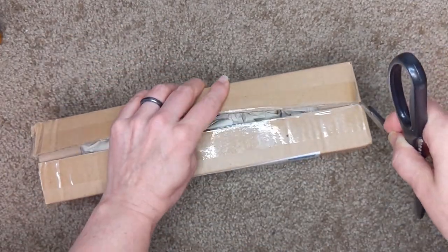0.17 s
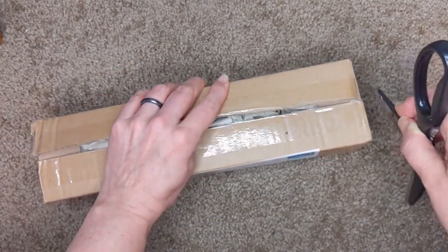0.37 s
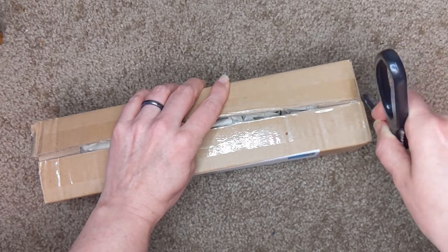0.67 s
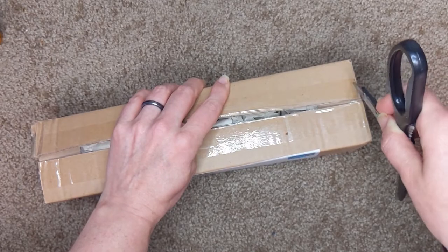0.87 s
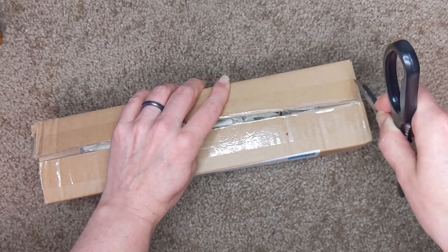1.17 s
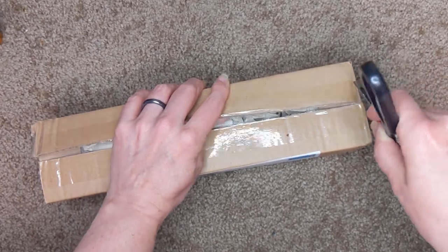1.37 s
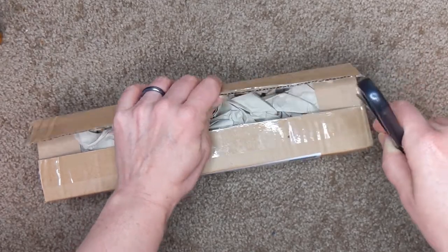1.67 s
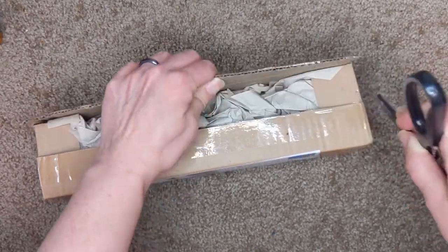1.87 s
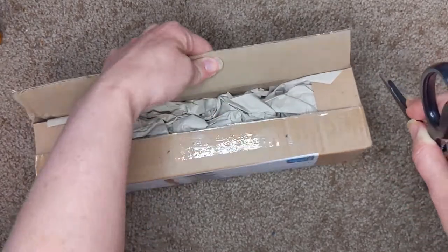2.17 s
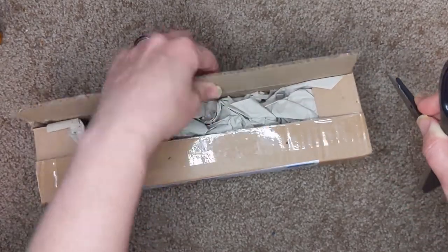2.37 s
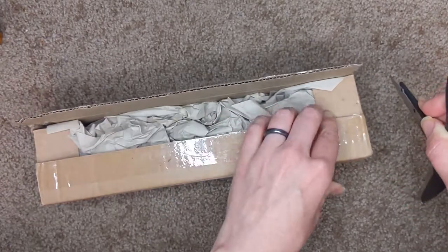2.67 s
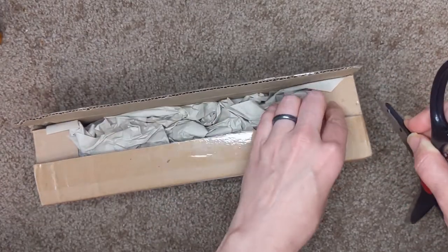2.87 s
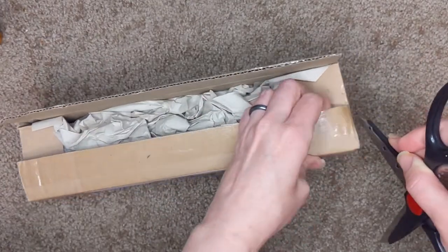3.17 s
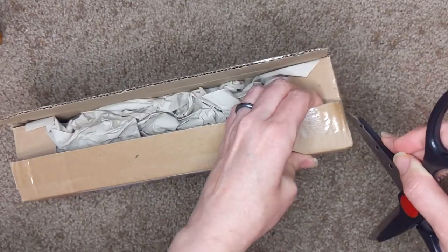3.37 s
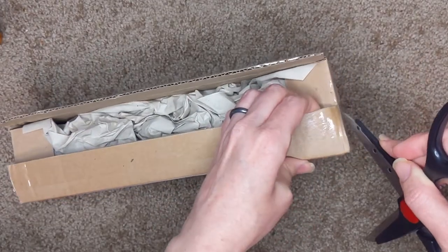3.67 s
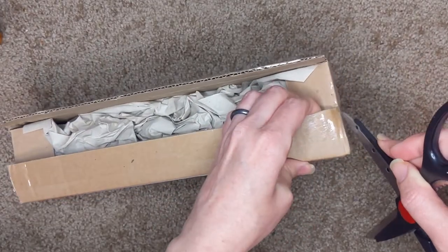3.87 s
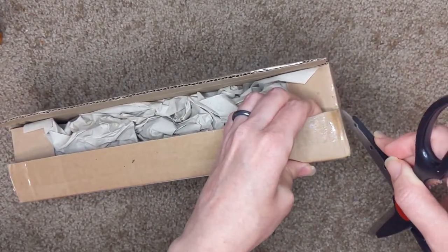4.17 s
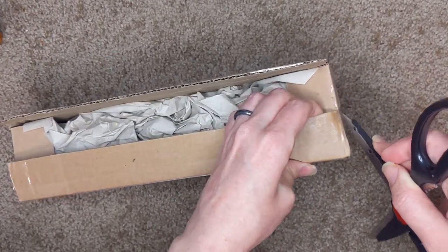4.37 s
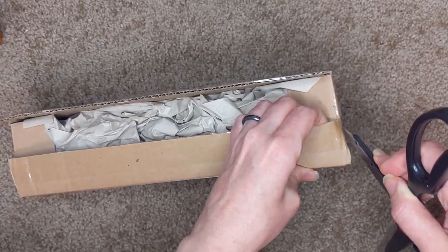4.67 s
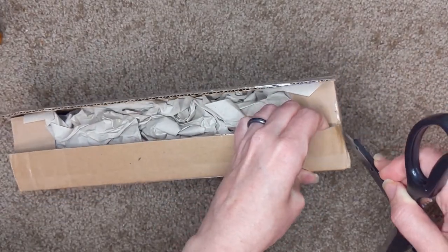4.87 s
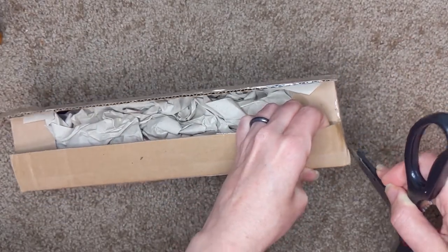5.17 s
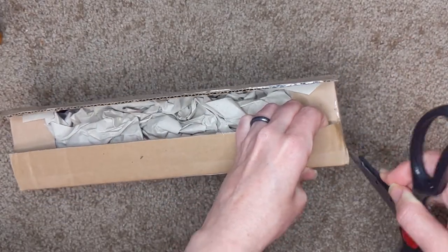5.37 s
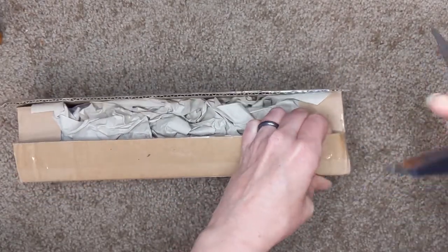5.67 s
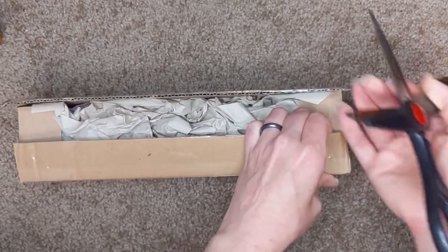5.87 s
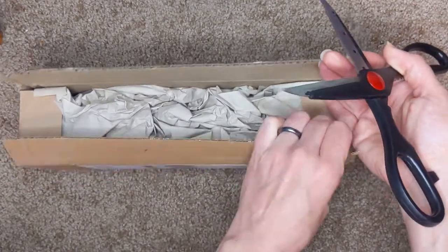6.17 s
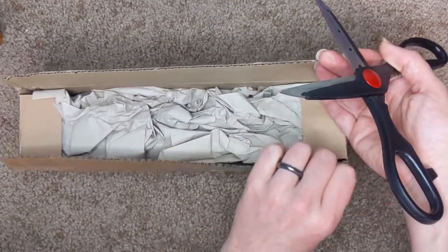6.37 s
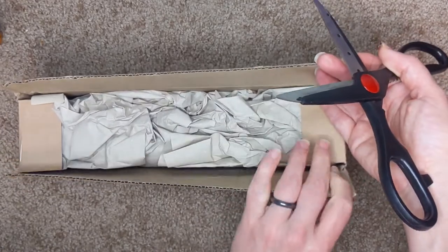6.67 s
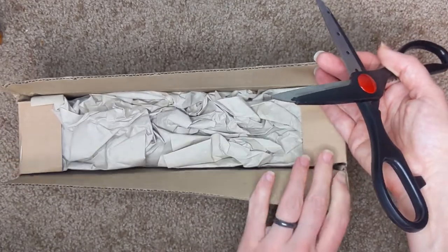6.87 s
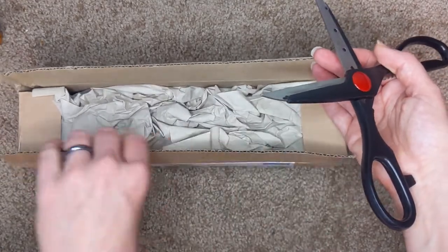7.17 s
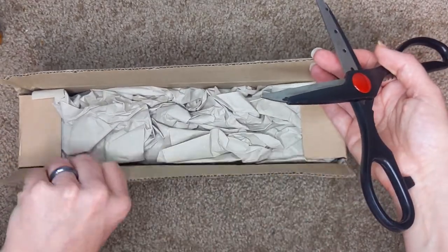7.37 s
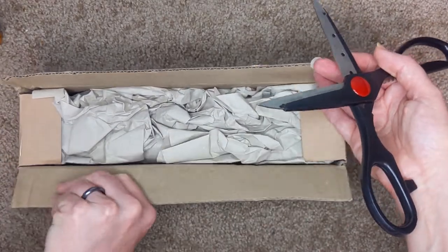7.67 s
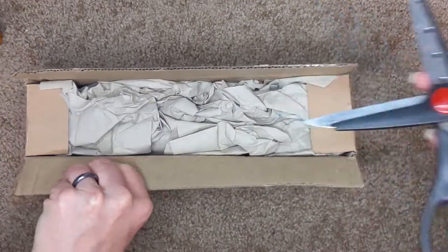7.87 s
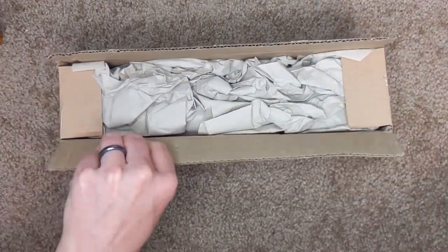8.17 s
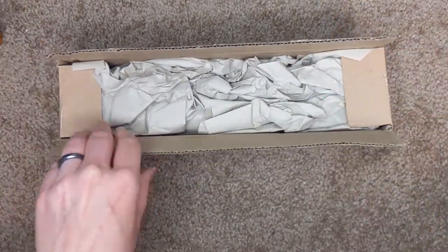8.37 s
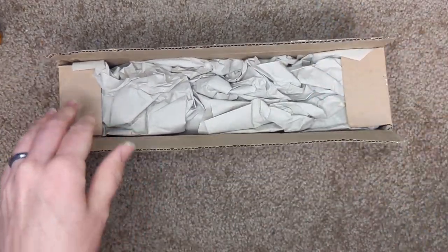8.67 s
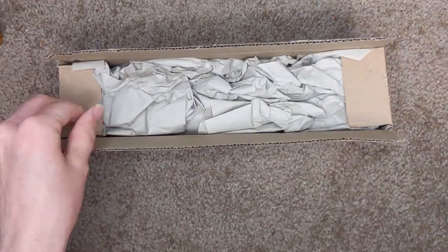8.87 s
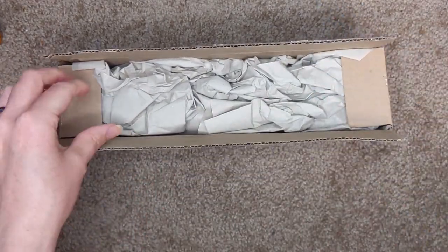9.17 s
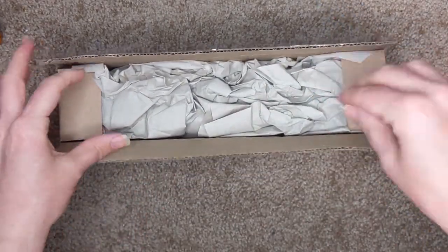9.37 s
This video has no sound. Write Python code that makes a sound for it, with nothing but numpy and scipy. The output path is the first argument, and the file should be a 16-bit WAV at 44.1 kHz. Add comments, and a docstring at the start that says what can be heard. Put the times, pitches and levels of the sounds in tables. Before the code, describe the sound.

A taped cardboard box pops open with a loud crack, flaps and hands scrape and rustle, then scissors drop with a bright clatter.

```python
"""A small carpeted room, where a long cardboard box is opened: scissors pick at the tape until it snaps,
flaps are pulled up and scrape, hands slide over card and paper, and the scissors clatter down on something hard.
Sliding and crushing are trains of tiny stick-slip bursts through resonant colours; knocks and ticks are short
noise bursts and panel modes; the scissors are damped modes and noise; a binding blade groans as an unsteady tone.
A low hum of two beating tones and quiet air lie underneath."""
import sys
import numpy as np
from scipy import signal
from scipy.fft import rfft, irfft, next_fast_len
from scipy.io import wavfile
from scipy.ndimage import uniform_filter1d

SR = 44100
rng = np.random.default_rng(int(sys.argv[2]) if len(sys.argv) > 2 else 0)


def materialize(psi):
    """Save the field psi as 16-bit PCM at rate SR to the path in sys.argv[1].

    A 1-D psi becomes a single channel; in a 2-D psi each row is a channel.
    """
    bounded = np.clip(np.atleast_2d(psi).T, -1, 1)
    quanta = np.round(bounded * 32767).astype(np.int16)
    wavfile.write(sys.argv[1], SR, quanta)


N = 418950
TIME = np.arange(N) / SR
AGE = TIME[:SR // 3]  # seconds since a contact

# Spectrum of the hiss of skin and paper. Each row: frequency in Hz, filter gain in dB.
HISS_COLOUR = [(400, -35.5), (1500, -10), (5000, -7), (7200, -9.5), (9500, 0), (12000, -1), (16000, -6.5)]
# Spectrum of a hollow box. Each row: frequency in Hz, filter gain in dB.
HOLLOW_COLOUR = [(60, -27.5), (200, -7), (400, -2.5), (520, -5), (750, -21.5), (2000, -38)]


def undb(db):
    """Logarithmic level: decibels become an amplitude gain."""
    return 10 ** (np.asarray(db) / 20)


def colour(x, points):
    """Minimum-phase filtering: the folded cepstrum of a gain curve (Hz, dB) yields a causal response."""
    n = next_fast_len(x.shape[-1] + SR // 10, True) // 2 * 2
    n = 2 * next_fast_len(n // 2, True)
    hz, db = np.transpose(points)
    bins = np.maximum(np.arange(n // 2 + 1) * SR / n, 1)
    gain_db = np.interp(np.log(bins), np.log(hz), db)
    cepstrum = irfft(np.log(undb(gain_db)), n)
    # fold the anticausal half onto the causal half
    cepstrum[1:n // 2] *= 2
    cepstrum[n // 2 + 1:] = 0
    response = np.exp(rfft(cepstrum))
    return irfft(rfft(x, n) * response, n)[..., :x.shape[-1]]


def unit(x):
    """Normalisation of power: scale to rms 1."""
    return x / np.sqrt(np.mean(x ** 2))


def blow(x, window=0.012):
    """Normalisation of energy: scale a hit to the energy of a short window (s) at rms 1."""
    return unit(x) * np.sqrt(window * SR / x.shape[-1])


def fade(t60):
    """Exponential damping: the amplitude falls by 60 dB in t60 seconds."""
    return np.exp(-np.log(1000) * AGE / max(t60, 1e-3))


def ports(mid, side, split_hz):
    """Spatial coherence: two microphones hear long waves alike and short waves differently."""
    low, high = (signal.butter(2, min(split_hz, SR / 4), kind, fs=SR) for kind in ("low", "high"))
    shared = signal.lfilter(*low, mid)
    return np.array([shared + signal.lfilter(*high, s) for s in side])


def noise(n, split_hz):
    """Partly coherent stereo noise: common below the split, independent above it."""
    return ports(rng.standard_normal(n), rng.standard_normal((2, n)), split_hz)


def add(out, s, x):
    """Superposition: mix a sound in at time s."""
    i = max(int(s * SR), 0)
    out[:, i:i + x.shape[-1]] += x[..., :N - i]


def walk(rate):
    """Smoothed random fluctuation about zero, with rate new values a second and a spread near 0.6."""
    k = max(int(SR / rate), 2)
    held = np.repeat(rng.standard_normal(N // k + 1), k)
    return 0.7 * uniform_filter1d(held, k)[:N]


def resonate(x, peaks):
    """Parallel resonance: each peak (Hz, width Hz, dB) passes its own band."""
    out = 0
    for hz, width, db in peaks:
        out = out + undb(db) * signal.lfilter(*signal.iirpeak(hz, hz / width, fs=SR), x)
    return out


def shifting(x, depth_db, rate):
    """Moving contact patch: each octave swells and sinks by itself."""
    out = 0
    for hz in 700 * 2. ** np.arange(4):
        low = signal.sosfiltfilt(signal.butter(3, hz, fs=SR, output="sos"), x)
        out = out + low * undb(depth_db * walk(rate))
        x = x - low
    return out + x


def snap(sharp_s, tail, tail_s):
    """Impulsive contact: a noise burst with a weaker tail (t60 in s) that takes 1.2 ms to build up."""
    rise = np.clip(AGE / .0012, 0, 1)
    return noise(len(AGE), 1100) * rise * (fade(sharp_s) + tail * fade(tail_s))


def background(hum_db=-5.0):
    """Interference of two close tones makes a slowly beating hum over broadband room air."""
    # Tones of the hum. Each row: frequency in Hz, level in dB before hum_db, time of opposition in seconds.
    hum_tones = [(59.4, -62.5, .3), (58.79, -68, .3)]
    # Spectrum of the room air. Each row: frequency in Hz, filter gain in dB.
    air_colour = [(15, -31), (25, -5), (64, -8), (195, -18.5), (326, -18), (1070, -25), (7110, -33),
                  (13200, -31), (16000, -40.5)]
    hum = 0
    for k, (hz, db, s) in enumerate(hum_tones):
        tone = np.sqrt(2) * np.cos(2 * np.pi * hz * (TIME - s))
        hum = hum + (-1) ** k * undb(db) * tone
    air = noise(N, 630) + 1.7 * rng.standard_normal((2, N))
    return undb(-67.0) * unit(colour(air, air_colour)) + undb(hum_db) * hum


def friction(rate, spread_db, grain_s, smooth, split_hz):
    """Stick-slip: fibres catch and let go in tiny bursts of uneven size over a smooth sliding noise."""
    slips = rng.random(N) < rate / SR
    sizes = undb(spread_db * np.minimum(rng.exponential(size=N), 3)) * slips
    bursts = signal.lfilter([1], [1, -np.exp(-1 / (grain_s * SR))], sizes)
    return (unit(bursts) + smooth) * noise(N, split_hz)


def stroke(s, length):
    """Kinematics of one sliding movement: its speed rises, holds and falls to rest."""
    attack, release = 0.15, 0.5  # shares of the length
    corners = s + length * np.array([0, attack, 1 - release, 1])
    return np.interp(TIME, corners, [0, 1, 1, 0])


def crinkles(per_s, low_hz=800, high_hz=11000, swings=9):
    """Buckling: creases give way in little damped oscillations, each with its own size and pitch."""
    spread_db = 4
    out, age = np.zeros((2, N)), AGE[:SR // 30]
    for when, pitch, size, lag in rng.random((int(per_s * N / SR), 4)):
        hz = low_hz * (high_hz / low_hz) ** pitch
        phases = np.array([[0], [(lag - .5) * hz / low_hz]])
        decay = np.exp(-np.log(1000) * age * hz / swings)  # -60 dB after this many swings
        grain = np.sin(2 * np.pi * hz * age + phases) * decay
        add(out, when * N / SR, undb(-spread_db * np.log(max(size, .05))) * grain)
    return unit(out)


def rubbing():
    """Sliding friction: card gives the scrape, the box its hollow body, skin and paper the hiss."""
    # Strokes of blade, flap or hand: the blade picks at the tape, the far flap is lifted, fingers push in
    # by the paper, the blade works at the end, the near flap opens, the hand moves on to the end flap.
    # Each row: start in seconds, length in seconds, then scrape, hiss and hollow box levels in dB.
    strokes = [ (0.0, 0.46, -73.5, -73, -76.5), (1.002, 0.061, -57.5, -57, -61),
               (1.101, 0.047, -58, -60, -61.5), (1.218, 0.16, -61, -59.5, -66.5),
               (1.353, 0.36, -59, -62.5, -55.5), (1.556, 0.027, -44, -58, -39), (1.69, 0.47, -65, -70, -69),
               (1.836, 0.093, -77, -56.5, -83), (1.985, 0.26, -58.5, -56, -64),
               (2.147, 0.029, -49.5, -52.5, -52.5), (2.185, 0.34, -68, -64, -76),
               (2.753, 0.18, -60.5, -57, -65), (2.99, 0.43, -56.5, -61.5, -62), (4.25, 0.56, -66, -68, -75),
               (4.414, 0.14, -64, -64.5, -61.5), (4.496, 0.027, -53.5, -53.5, -58),
               (4.583, 0.5, -64, -61, -71.5), (5.1, 0.25, -60.5, -60.5, -67),
               (5.197, 0.022, -47.5, -44.5, -48.5), (5.246, 0.62, -62, -62, -67.5),
               (5.44, 0.032, -49, -53, -49.5), (5.688, 0.67, -66.5, -58.5, -74),
               (5.962, 0.52, -58.5, -64.5, -61), (6.37, 0.13, -59.5, -53.5, -68),
               (6.488, 0.1, -53.5, -49, -58.5), (6.623, 0.061, -49.5, -48.5, -57),
               (6.528, 0.62, -57.5, -58.5, -64.5), (6.805, 0.077, -58, -46.5, -56),
               (6.949, 0.28, -56.5, -43.5, -67), (7.179, 0.21, -59.5, -50, -66.5),
               (7.419, 0.47, -53, -53.5, -58.5), (7.743, 0.68, -59, -54, -67.5),
               (8.125, 0.11, -62, -48.5, -69), (8.484, 0.68, -60, -64.5, -67),
               (9.173, 0.48, -65, -65.5, -63), (9.292, 0.033, -50, -46.5, -44.5),
               (9.351, 0.03, -41.5, -38.5, -45.5), (9.421, 0.084, -52.5, -52, -71)]
    # Spectrum of scraped card. Each row: frequency in Hz, filter gain in dB.
    card_colour = [(200, -17.5), (500, -9), (800, -3), (1050, 1), (1350, -6.5), (2100, -7), (3400, -7),
                   (5200, -11.5), (7500, -18), (16000, -29.5)]
    rest_db = -80.5  # the resting hand never lies quite still
    crinkle_db = -5  # relative to the card's scrape
    crinkle_full_db = -52.5  # lighter scrapes than this crease the card less

    power = np.full((3, N), undb(rest_db) ** 2)
    for s, length, scrape_db, hiss_db, box_db in strokes:
        power += np.outer(undb([scrape_db, hiss_db, box_db]) ** 2, stroke(s, length) ** 2)
    scrape, hiss, hollow = np.sqrt(power)

    fibres = friction(rate=1000, spread_db=4.2, grain_s=.0008, smooth=.55, split_hz=1700)
    card = unit(shifting(colour(fibres, card_colour), depth_db=1.5, rate=54))
    creasing = np.minimum(scrape / undb(crinkle_full_db), 1)
    card = card + undb(crinkle_db) * crinkles(per_s=70) * creasing
    body = friction(rate=740, spread_db=0.5, grain_s=0.0024, smooth=0.99, split_hz=610)
    box = unit(colour(body, HOLLOW_COLOUR))
    skin = friction(rate=1900, spread_db=6.0, grain_s=0.00062, smooth=3.6, split_hz=690)
    skin = unit(colour(skin, HISS_COLOUR))
    grip_db = 2.0 * walk(50)
    return (card * scrape + box * hollow) * undb(grip_db) + skin * hiss * undb(.5 * grip_db)


def box_ring(panel_hz):
    """Modal excitation: the box walls ring briefly; a small, high-pitched panel hardly stirs deep modes."""
    # Modes of the empty box. Each row: frequency in Hz (varied by some 3 %), level in dB (varied by some
    # 2 dB and relative within the ring), t60 in seconds.
    box_modes = [(147, 26.5, 0.097), (267.3, 6, .12), (480, 7, 0.07), (980, 4, 0.043), (1660, -1.5, 0.023)]
    out = 0
    for hz, db, t60 in box_modes:
        size, bend = rng.standard_normal(2)
        drive = min(hz / panel_hz, 1) ** 3
        mode = np.sin(2 * np.pi * hz * (1 + 0.03 * bend) * AGE) * fade(t60)
        out = out + undb(db + 2.0 * size) * drive * mode
    return blow(out)


def crack():
    """Fracture noise: the woody snap of card."""
    # Spectrum of the crack. Each row: frequency in Hz, filter gain in dB.
    crack_colour = [(100, -12.5), (500, -7.5), (1400, 7.5), (2200, 0.5), (2900, 3), (4700, -2.5),
                    (7000, -9.5), (16000, -26.5)]
    return blow(colour(snap(sharp_s=.017, tail=.42, tail_s=.06), crack_colour))


def tick():
    """Sudden release of adhesion: the thin snap of tape."""
    # Spectrum of the tick. Each row: frequency in Hz, filter gain in dB.
    tick_colour = [(600, -31), (5000, -2.5), (7500, -10.5), (9700, 4), (12000, -1.5), (16000, -5)]
    return blow(colour(snap(sharp_s=.007, tail=.2, tail_s=.04), tick_colour))


def knocks(swings=8, swell_s=0.003):
    """Release of stored tension: as tape or flap lets go come a tick, a card crack and a few panel swings."""
    # Knocks of the box and snaps of tape. Each row: start in seconds, panel frequency in Hz, thump level,
    # crack level and tick level in dB.
    knock_list = [(0.002, 334, -45, -63, -57), (0.305, 330, -66, -61, -57.5), (0.341, 274, -56, -65, -70),
                  (0.598, 407, -45, -76, -76), (0.835, 256, -61, -60.5, -60), (0.971, 955, -69, -57, -58.5),
                  (1.126, 286, -52.5, -76, -81), (1.352, 232, -55.5, -55, -67),
                  (1.402, 215, -50.5, -59, -58.5), (1.448, 275, -37, -43.5, -50.5),
                  (1.578, 288, -20, -23, -25.5), (2.096, 1000, -52.5, -61, -62),
                  (3.043, 1070, -53, -47, -53), (3.116, 1040, -49, -48, -46.5),
                  (3.273, 870, -51, -51.5, -61), (3.312, 580, -56.5, -57.5, -55),
                  (4.213, 830, -67, -75, -77), (5.158, 985, -48, -44, -39.5), (5.582, 1100, -78, -53, -54),
                  (5.688, 393, -50.5, -51, -54), (6.007, 328, -48, -47.5, -67.5),
                  (6.025, 230, -46, -54, -61), (6.144, 1094, -26.5, -26, -25),
                  (6.19, 1000, -47, -50, -36.5), (6.492, 486, -51, -53.5, -57),
                  (6.742, 820, -51.5, -54.5, -59), (6.798, 553, -44.5, -49.5, -48),
                  (6.831, 423, -48, -45.5, -58), (7.326, 410, -49, -56, -60),
                  (7.471, 480, -53.5, -54.5, -63), (7.502, 262, -55, -52, -55), (8.112, 460, -43, -45, -59)]
    # Spectrum of a thump on the box walls. Each row: frequency in Hz, filter gain in dB.
    thump_colour = [(35, -46.5), (80, -9.5), (150, -1.5), (1400, 1), (3000, -12), (8000, -32)]
    box_ring_db = -4.5  # relative to the thump
    boom_colour = [(60, -23.0), (105, 0.5), (260, -1.5), (3000, -45.5)]  # Hz, dB

    out = np.zeros((2, N))
    for s, hz, thump_db, crack_db, tick_db in knock_list:
        panel = np.sin(2 * np.pi * hz * AGE) * fade(swings / hz) * (1 - np.exp(-AGE / swell_s))
        # the whole box booms low under a large panel's own note
        boom = colour(noise(len(AGE), 1800) * fade(0.036), boom_colour)
        boom_share = 0.77 * min(300 / hz, 1)
        walls_colour = [(hz / 2, -15), (hz, 0), (hz + 250, -2), (hz + 900, -10), (6000, -35)]
        walls = colour(noise(len(AGE), 2000) * fade(0.05), walls_colour)
        thump = blow(panel) + boom_share * blow(boom) + 0.45 * blow(walls)
        thump = blow(colour(thump, thump_colour)) + undb(box_ring_db) * box_ring(hz)
        add(out, s, undb(thump_db) * thump + undb(crack_db) * crack() + undb(tick_db) * tick())
    return out


def ticks():
    """Small impulsive releases: tape unsticks or a fold flips, too slight to move the box."""
    # Dry ticks of sticky tape and paper. Each row: start in seconds, level in dB.
    tick_list = [(0.101, -61), (0.518, -57.5), (1.09, -52.5), (1.574, -30), (2.216, -45), (2.311, -50.5),
                 (2.333, -51.5), (2.378, -56.5), (3.003, -50), (3.455, -54), (6.378, -58), (6.399, -50.5),
                 (6.811, -52), (6.818, -46.5), (6.88, -50), (7.36, -45.5), (7.404, -53), (7.821, -46.5),
                 (7.987, -49.5), (8.103, -45.5), (8.257, -58)]
    crack_db = -12.5  # the card's share, relative to the tick
    out = np.zeros((2, N))
    for s, db in tick_list:
        add(out, s, undb(db) * (tick() + undb(crack_db) * crack()))
    return out


def binds(wall_hz=400):
    """Stick-slip drive: the binding blade makes the end wall groan, an unsteady woody note and a rasp."""
    # Groans of the end wall. Each row: time of the slip in seconds, level in dB, rasp level in dB
    # relative to the note.
    slips = [(0.603, -55, 1), (1.826, -50.5, 5.5), (5.159, -35.5, -1), (5.211, -37, -2.5),
             (5.388, -47, -1.5)]
    # Resonances of the wall around its main note. Each row: frequency in Hz, width in Hz, level in dB
    # relative within the rasp.
    wall_peaks = [(227, 24, 1.5), (530, 95, 3.5), (940, 220, 0.5), (1580, 96, -1.5)]
    swell_s, decay_s = 0.0079, 0.0095  # time constants before and after the slip

    unsteady_hz = wall_hz * (1 + .07 * walk(160))
    note = np.sin(2 * np.pi * np.cumsum(unsteady_hz) / SR)
    rasp = unit(resonate(noise(N, 1200), wall_peaks))
    out = 0
    for s, db, rasp_db in slips:
        distance = np.maximum((s - TIME) / swell_s, (TIME - s) / decay_s).clip(0, 20)
        out = out + (note + undb(rasp_db) * rasp) * undb(db) * np.exp(-distance)
    return out


def crease(hz=980):
    """Plastic yielding: the fold gives way in little slips that ring the flap, weaker as the card yields."""
    # Flaps bending slowly along their creases. Each row: start in seconds, length in seconds,
    # level in dB at the start, from which it sags.
    bends = [(2.0, 0.46, -55), (4.26, 0.38, -68.5), (6.46, 0.56, -59), (7.47, 0.54, -58)]
    yield_db_per_s = 14
    slips = friction(rate=260, spread_db=3, grain_s=0.0012, smooth=.15, split_hz=1600)
    flap = colour(slips, [(hz / 2, -25), (hz - 160, -3), (hz, 0), (hz + 160, -3), (2 * hz, -28)])
    level = 0
    for s, length, db in bends:
        sagging_db = db - yield_db_per_s * np.maximum(TIME - s, 0)
        level = level + stroke(s, length) * undb(sagging_db)
    return unit(flap) * level


def crush(s, length):
    """Loading and unloading: pressure on the paper swells and eases as half a sine."""
    return np.sin(np.pi * np.clip((TIME - s) / length, 0, 1))


def paper(crackle_db=-2, hiss_db=-10):
    """Crackling noise: dense slips ring the paper's ever-changing pockets, and single folds snap on top."""
    # Fingers or blade crush the packing paper. Each row: start in seconds, length in seconds, level in dB.
    crushes = [(2.802, 0.059, -48), (2.901, 0.089, -54.5), (2.997, 0.035, -43.5), (3.022, 0.038, -43.5),
               (3.03, 0.17, -58.5), (3.081, 0.04, -49), (3.431, 0.044, -54.5), (5.479, .055, -57.5)]
    # Pockets and folds of crumpled paper. Each row: frequency in Hz, width in Hz, relative level in dB.
    pocket_peaks = [(1020, 410, 5), (3110, 770, -3.5), (4930, 900, -12)]
    slips = friction(rate=1400, spread_db=3.5, grain_s=.0006, smooth=.35, split_hz=1700)
    pockets = shifting(resonate(slips, pocket_peaks), depth_db=2.5, rate=45)
    folds = crinkles(per_s=130, low_hz=1240)
    hiss = unit(colour(slips, HISS_COLOUR))
    sound = unit(pockets) + undb(crackle_db) * folds + undb(hiss_db) * hiss
    return sound * sum(undb(db) * crush(s, length) for s, length, db in crushes)


def ring(lo_hz, hi_hz, freedom):
    """Modal synthesis: the modes within a range, weighted and detuned a little by every contact."""
    # Modes of scissors and the surface under them. Each row: frequency in Hz (before detuning), level in dB
    # relative within a range, t60 in seconds before the factor of freedom.
    modes = [(165.7, -16, .3), (261.7, 5, 0.088), (311, 0, 0.071), (470, 16, 0.13), (522, 2.5, 0.044),
             (689, -5, 0.069), (813, 7.5, 0.074), (1603, 4, 0.11), (2020, -4.5, 0.1), (2505, 7.5, 0.061),
             (3370, 4, 0.11), (4220, 0.5, 0.13), (4820, 4.5, .07), (5470, 4.5, 0.069)]
    detune_hz = 5  # the support shifts the modes from contact to contact
    sing_db, sing_t60_s = -46.5, 0.84  # the low modes sing on faintly
    out = 0
    for hz, db, t60 in modes:
        size, phase, turn, bend = rng.standard_normal(4)
        if lo_hz <= hz < hi_hz:
            # short waves reach the two microphones out of step
            phases = phase + np.array([[0], [turn * hz / 3000]])
            singing = undb(sing_db) * min(1000 / hz, 1) ** 2 * fade(sing_t60_s)
            decay = fade(t60 * freedom) + singing
            mode = np.sin(2 * np.pi * (hz + detune_hz * bend) * AGE + phases)
            out = out + undb(db + size) * mode * decay
    return blow(out * np.clip(AGE * hi_hz / 2, 0, 1))


def scissors(lag_s=.0004, steel_pan_db=8, focus_db=6, focus_width_hz=400):
    """Impact of plastic handles and steel blades on a hard surface, off to the right by lag and level."""
    # Contacts as the scissors land and rock. Each row: start in seconds, then surface, frame, handle and
    # blade levels in dB, the blade's brightest frequency in Hz, tick level in dB.
    drops = [(8.452, -78, -43, -47.5, -33, 3810, -30), (8.461, -55.5, -41.5, -43.5, -41, 3360, -38),
             (8.58, -73, -50, -55, -47, 1700, -46), (8.749, -58.5, -51.5, -25.5, -19.5, 2500, -13),
             (8.809, -59.5, -62.5, -46.5, -26, 2590, -29.5), (8.825, -34, -22, -15.5, -24, 2440, -15.5),
             (8.832, -37.5, -32.5, -21, -24, 2940, -16.5), (8.838, -34.5, -30, -24, -19, 4800, -12),
             (8.851, -38.5, -40.5, -33.5, -22, 5770, -24.5), (8.862, -31.5, -40, -18, -23, 4600, -16.5),
             (8.875, -33, -36.5, -21, -24.5, 5460, -23), (8.922, -46, -44, -49, -34, 3000, -42.5),
             (9.008, -51, -42.5, -42.5, -33.5, 3350, -36.5), (9.025, -46.5, -59, -39, -39, 1900, -61),
             (9.052, -46, -54, -49, -46.5, 2730, -71)]
    # Light contacts leave the scissors free, heavy ones damp them. Each row: handle level in dB,
    # factor on t60.
    freedom_points = [(-52.5, 1.3), (-25.5, 0.84)]
    # Spectrum of the blades' clack. Each row: frequency in Hz, filter gain in dB.
    clack_colour = [(200, -17.5), (700, -3.5), (1500, 6.5), (2600, -1.5), (3500, 0.5), (5000, -1),
                    (6500, -4), (7500, -7.5), (16000, -51)]
    # Spectrum of the bright steel tick. Each row: frequency in Hz, filter gain in dB.
    steel_colour = [(1000, -58.5), (7600, -10), (8700, 2.5), (9700, 6), (12500, 1.5), (14000, 2),
                    (16000, -9.5)]

    out = np.zeros((2, N))
    # the dense upper modes of steel and plastic are the same at every contact
    dense = snap(sharp_s=0.056, tail=0.68, tail_s=0.099)
    sides = undb(np.array([[-steel_pan_db], [0]]))
    edges_hz = [100, 380, 620, 1000, 8000]
    for s, surface_db, frame_db, handle_db, blade_db, blade_hz, tick_db in drops:
        freedom = np.interp(handle_db, *np.transpose(freedom_points))
        low, frame, handle, blades = (ring(lo, hi, freedom) for lo, hi in zip(edges_hz, edges_hz[1:]))
        thud = blow(colour(snap(sharp_s=.05, tail=.2, tail_s=.1), HOLLOW_COLOUR))
        body = undb(surface_db) * (1.14 * low + 0.37 * thud)
        body = body + undb(frame_db) * frame + undb(handle_db) * handle
        strike = dense + 2 * snap(sharp_s=0.019, tail=0.19, tail_s=0.21)
        clack = 0.44 * blades + 1.3 * blow(colour(strike, clack_colour))
        # the place that is struck favours one part of the blades' ring
        clack = blow(clack + resonate(clack, [(blade_hz, focus_width_hz, focus_db)]))
        steel = dense + 2 * snap(sharp_s=.016, tail=.2, tail_s=.055)
        steel = blow(colour(steel, steel_colour))
        add(out, s, body + undb(blade_db) * clack + undb(tick_db) * sides * steel)
    # the right microphone is reached first
    return np.array([np.interp(TIME - lag_s, TIME, out[0]), out[1]])


def room(x, wet_db, linger_db):
    """Reverberation by convolution: a short even tail, and low notes that linger faintly."""
    early = noise(len(AGE), 1100) * fade(0.17) * np.clip(AGE / 0.0038, 0, 1)
    late_colour = [(240, 4), (480, -4.5), (1200, -2.5), (8000, -29.5)]  # Hz, dB
    late = colour(noise(len(AGE), 1200), late_colour) * fade(0.56)
    response = undb(wet_db) * early + undb(linger_db) * late
    response = response / np.sqrt(np.sum(early[0] ** 2))
    return x + signal.fftconvolve(x, response, axes=1)[:, :N]


def scene():
    """Superposition of all sources, each group with its own share of reverberation."""
    sliding = room(rubbing() + crease() + paper(), wet_db=-7.5, linger_db=-34.5)
    releases = room(knocks() + ticks() + binds(), wet_db=-12.0, linger_db=-34.5)
    clatter = room(scissors(), wet_db=-13, linger_db=-23.5)
    return background() + sliding + releases + clatter


def record(dry):
    """Band limiting: a steep elliptic low-pass removes the extreme treble."""
    top_hz = 15900
    return signal.sosfilt(signal.ellip(10, .2, 80, top_hz, fs=SR, output="sos"), dry)


dry = scene()
out = record(dry)
materialize(out)
```